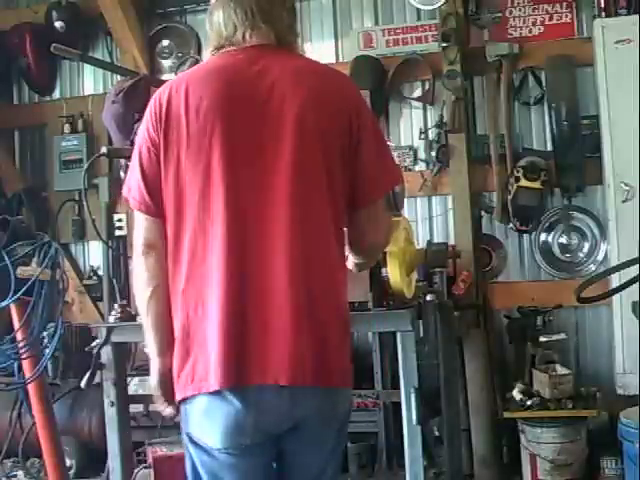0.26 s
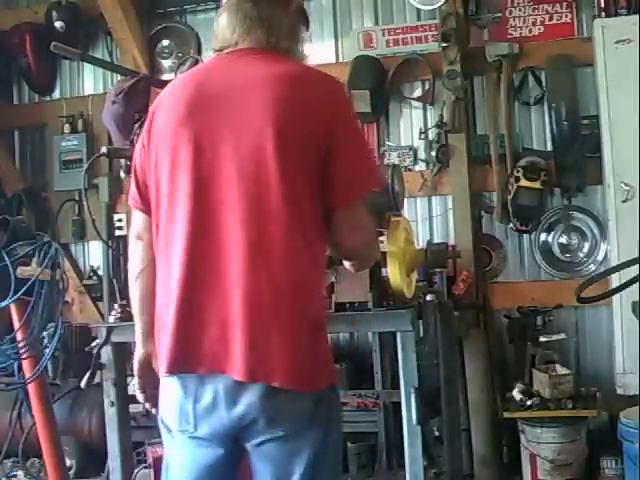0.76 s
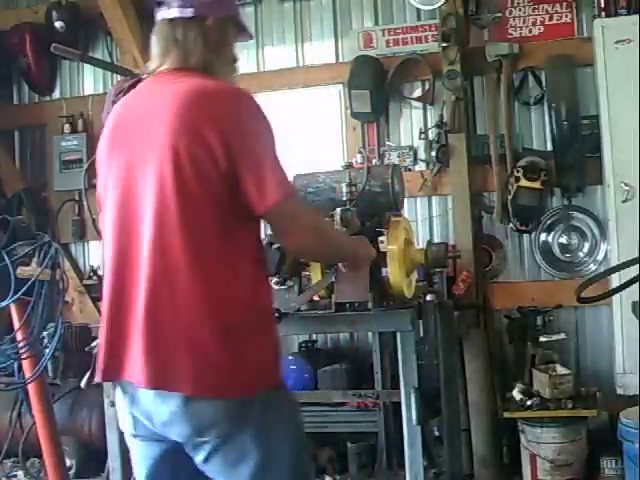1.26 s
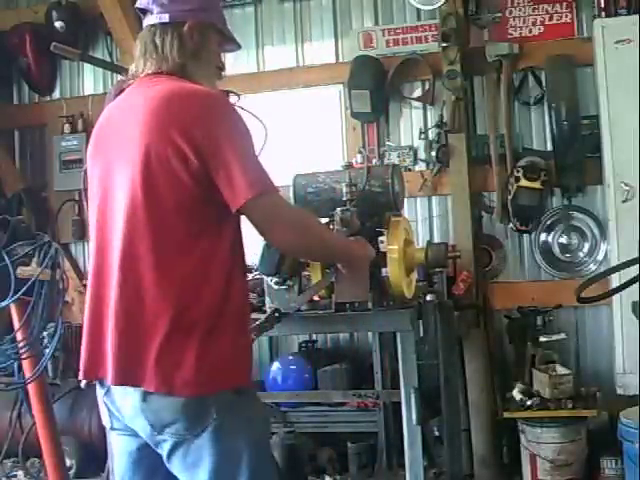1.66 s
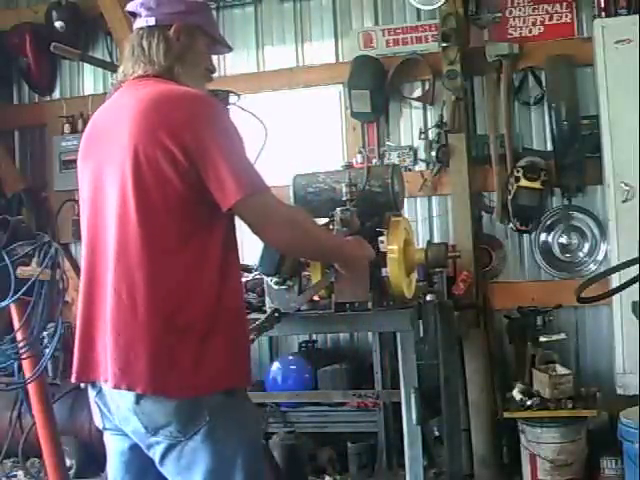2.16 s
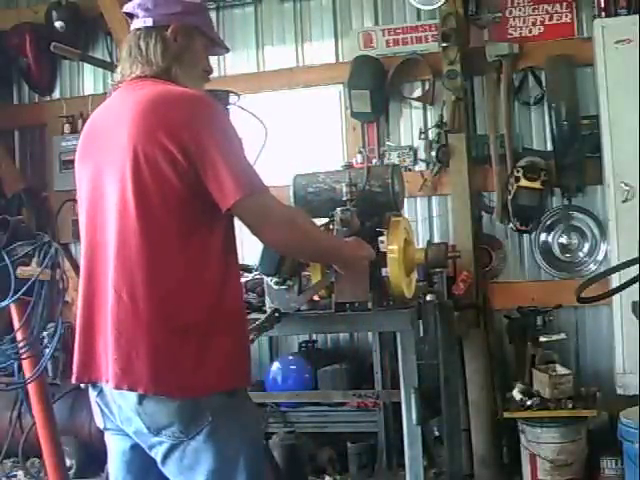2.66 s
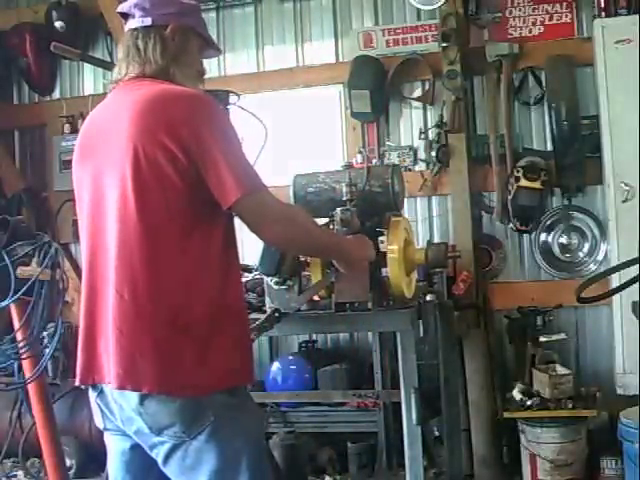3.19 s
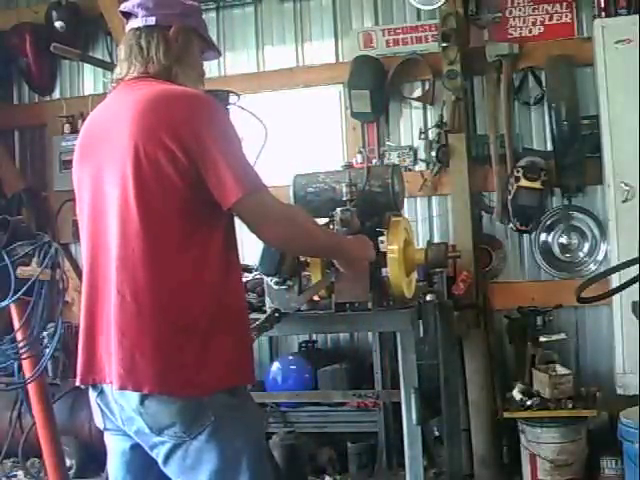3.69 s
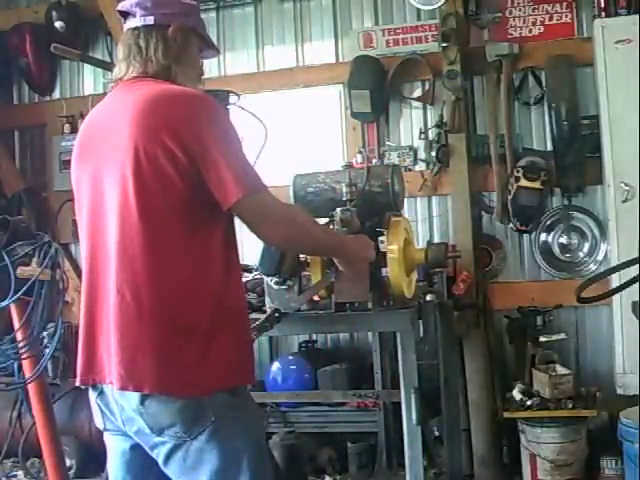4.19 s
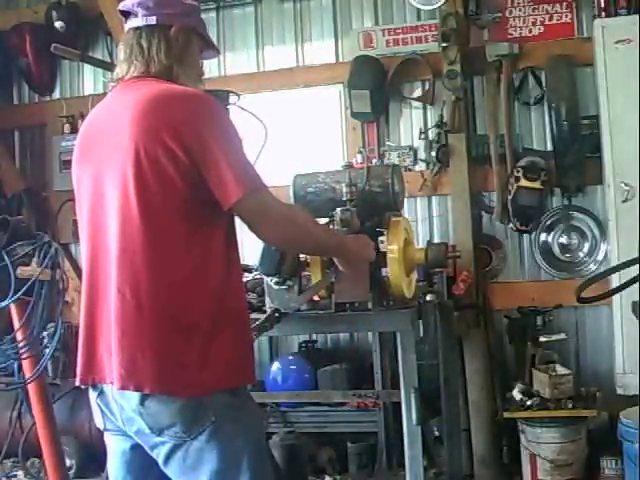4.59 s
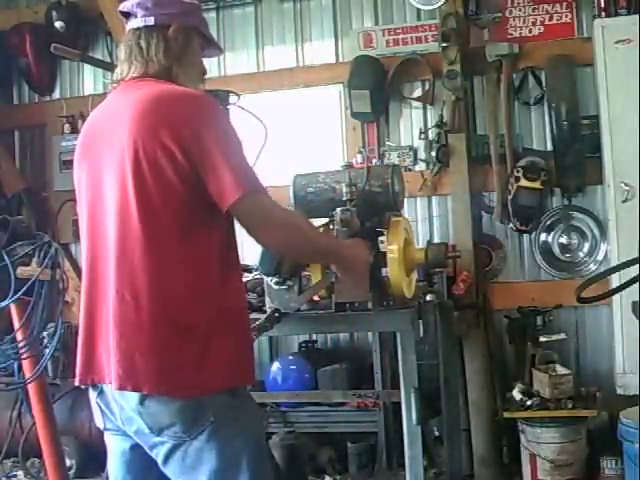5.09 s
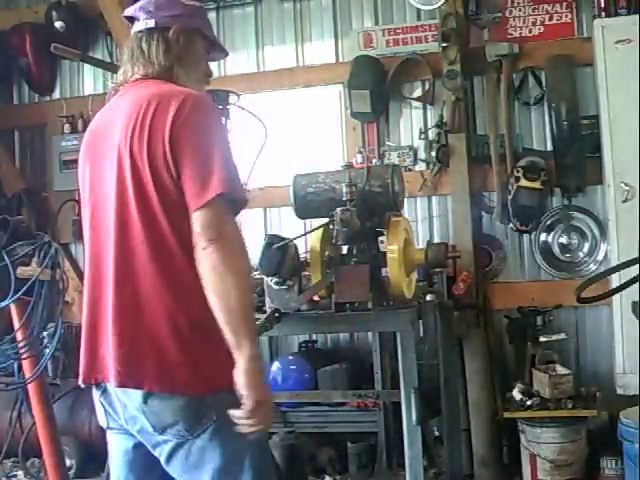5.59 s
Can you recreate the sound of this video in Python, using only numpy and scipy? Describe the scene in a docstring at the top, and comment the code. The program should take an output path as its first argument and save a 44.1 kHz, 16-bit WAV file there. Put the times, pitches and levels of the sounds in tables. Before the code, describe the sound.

An old single-cylinder engine chugs and rattles in a metal-walled shop, firing in loud, uneven, ringing bangs as it picks up speed.

```python
"""In a sheet-metal shop, an antique single-cylinder two-stroke runs on a bench.
It fires only now and then: each bang kicks the flywheel, which coasts against friction,
chugging, rasping and rattling once a turn. Each blast excites the resonances of pipe and bench
and reverberates between the metal walls. Once, burning charge spits back through the intake
in two quick bursts. The bangs overload a narrow-band microphone, which clips and crackles."""
import sys
import numpy as np
from scipy import signal
from scipy.fft import rfft, irfft, next_fast_len
from scipy.io import wavfile

SR = 44100
rng = np.random.default_rng(int(sys.argv[2]) if len(sys.argv) > 2 else 0)


def put_to_file(sound):
    """Save the sound as 16-bit audio at rate SR, in the file named by the first command-line argument."""
    columns = np.atleast_2d(sound).T  # one column per channel
    safe = np.clip(columns, -1, 1)
    whole_steps = np.round(safe * 32767)
    wavfile.write(sys.argv[1], SR, whole_steps.astype(np.int16))


N = 257984
TIME = np.arange(2 * SR // 3) / SR  # seconds within one event


def amp(db):
    """Amplitude ratio: a factor of ten per 20 dB."""
    return 10 ** (np.asarray(db) / 20)

def unit(x):
    """Normalisation to rms 1."""
    return x / np.sqrt(np.mean(x ** 2) + 1e-20)

def unit_onset(x):
    """Normalisation of a transient to rms 1 over its first 50 ms."""
    return x / np.sqrt(np.mean(x[:SR // 20] ** 2) + 1e-20)

def noise(size):
    """Gaussian white noise."""
    return rng.standard_normal(size)

def fade(t60):
    """Exponential decay by 60 dB in t60 seconds."""
    return amp(-60 * TIME / t60)

def swell(train, t60):
    """Convolution gives each impulse a quick rise and an exponential decay."""
    return signal.fftconvolve(train, fade(t60) * (1 - np.exp(-TIME / 0.014)))[:N]

def along(points, hz):
    """Interpolation of (Hz, value) points on a logarithmic frequency axis."""
    freqs, values = np.transpose(points)
    return np.interp(np.log(hz + 1), np.log(freqs), values)

def add(track, start_s, x):
    """Superposition of x on the track from start_s."""
    start = round(start_s * SR)
    x = x[max(-start, 0):max(len(track) - start, 0)]
    track[max(start, 0):][:len(x)] += x

def filtered(x, response):
    """Linear filtering: the spectrum is multiplied by a frequency response."""
    size = 2 * next_fast_len(len(x) // 2 + SR // 10)
    return irfft(rfft(x, size) * response(np.fft.rfftfreq(size, 1 / SR)), size)[:len(x)]

def coloured(x, spectrum):
    """Minimum-phase filtering: folding the cepstrum makes the response causal."""
    def response(hz):
        cepstrum = irfft(np.log(amp(along(spectrum, hz))))
        cepstrum[1:len(hz) - 1] *= 2
        cepstrum[len(hz):] = 0
        return np.exp(rfft(cepstrum))
    return filtered(x, response)

def rung(x, modes):
    """Modal superposition: x drives damped resonators in parallel."""
    return filtered(x, lambda f: sum(amp(db) * 1j * f * width / (hz * hz - f * f + 1j * f * width)
                                     for hz, width, db in modes))

def radiated(x, low_hz):
    """Radiation efficiency: a small source sends out little below low_hz."""
    return filtered(x, lambda hz: (1j * hz / low_hz) ** 4
                    / (1 + np.sqrt(2) * 1j * hz / low_hz - (hz / low_hz) ** 2) ** 2)

def turns(first_s=-.03, coast_s=3.7):
    """Times the exhaust port opens: between firings, friction slows the flywheel exponentially."""
    times = [first_s]
    for fire_s, *_, count in FIRINGS:
        share = np.linspace(0, 1, round(count) + 1)[1:]
        speed_lost = 1 - np.exp((times[-1] - fire_s) / coast_s)
        times.extend(times[-1] - coast_s * np.log(1 - share * speed_lost))
    return np.array(times)

def speed():
    """Rotation rate, the inverse of the period, in octaves above ten turns a second."""
    times = turns()
    midpoints = (times[1:] + times[:-1]) / 2
    return np.interp(np.arange(N) / SR, midpoints, -np.log2(10 * np.diff(times)))

def ticks(phase, scatter_db):
    """Cyclic excitation: one impulse a turn, at the fraction of the turn given by phase."""
    train, times = np.zeros(N), turns()
    for turn_s, period, deviation in zip(times, np.gradient(times), noise(len(times))):
        add(train, turn_s + phase * period, amp([scatter_db * deviation]))
    return train

# Decay of the shop. Each row: frequency in Hz, reverberation time in seconds.
SHOP_T60 = [(60, 0.62), (300, 0.67), (900, 0.67), (2000, 0.48), (4000, 0.27)]

def shop(x, wet_db):
    """Reverberation: reflections from the metal walls add a diffuse tail to the direct sound."""
    hz, t, spectra = signal.stft(noise(len(TIME)), SR, nperseg=256)
    decay = amp(-60 * t / along(SHOP_T60, hz)[:, None])
    tail = signal.istft(spectra * decay, SR, nperseg=256)[1]
    return x + amp(wet_db) * signal.fftconvolve(x, tail / np.linalg.norm(tail))[:len(x)]

# Modes of rubbing metal. Each row: frequency in Hz, nominal bandwidth in Hz, relative level in dB.
RUBBING_MODES = [(2952, 58, -2.5), (3177, 68, -3.5), (3700, 85, -1)]

def rasp():
    """Frictional excitation: dry metal rubs once a turn, and each mode varies on its own."""
    out = np.zeros(N)
    for hz, width, db in RUBBING_MODES:
        rub = unit(swell(ticks(.1, scatter_db=2), t60=.35))
        mode = [(hz, 2 * width, 0)]
        ring = rung(rung(noise(N), mode), mode)  # two passes steepen the skirts
        out += amp(db) * rub * unit(ring)
    return out * amp(-45.0 - 1.4 * speed())

# Boom of the exhaust port. Each row: frequency in Hz, bandwidth in Hz, relative gain in dB.
EXHAUST_MODES = [(56.3, 24, -1.5), (83, 42, 7.5), (109, 47, -3.5)]
# Rush of the gas. Each row: frequency in Hz, relative spectral density in dB.
PUFF_SPECTRUM = [(15, -31.5), (35, -15.5), (60, -5.5), (100, 1), (135, 0), (250, -4.5), (600, -41.5)]

def chug(gulp_phase=.29):
    """Pulsating flow: unfired charge puffs out of the port, and the piston gulps a new one."""
    puffs = ticks(0.062, scatter_db=1) + 1.2 * ticks(gulp_phase, scatter_db=1.5)
    boom = amp(-42.5) * unit(radiated(rung(puffs, EXHAUST_MODES), low_hz=40))
    flow = .06 + swell(puffs, t60=0.12)
    air = amp(-44) * unit(radiated(flow * coloured(noise(N), PUFF_SPECTRUM), low_hz=45))
    return (boom + air) * amp(9 * speed())

def shaking(steady_db=1.18, kick_db=3, delay_s=.09, width_s=0.048):
    """Amplitude modulation: the parts shake harder for a moment after each firing."""
    t = np.arange(N) / SR
    kicks = sum(np.exp(-((t - fire_s - delay_s) / width_s) ** 2) for fire_s, *_ in FIRINGS)
    return amp(steady_db + kick_db * kicks)

# Modes of the case and of loose iron. Each row: frequency in Hz, bandwidth in Hz, relative gain in dB.
CRANKCASE_MODES = [(182.4, 6.7, -12), (213.1, 6, -4), (263.5, 18, -6.5), (329.6, 20, 1), (368.5, 22, -9.5),
                   (408.2, 22, -9), (500, 15, -12.5)]
LOOSE_IRON_MODES = [(331.5, 9.8, 5), (778, 30, 3), (906, 80, -5.5), (1044, 34, -6), (1217, 61, -2.5),
                    (1292, 40, -5), (1405, 29, -7), (1650, 21, -9), (2286, 24, -15.5)]
# Rattle of loose parts. Each row: frequency in Hz, relative spectral density in dB.
RATTLE_SPECTRUM = [(90, -51.5), (130, -21.5), (200, -2), (400, 4.5), (600, -5), (1000, -0.5), (1400, -2.5),
                   (1900, -9), (2600, -14.5), (3300, -13.5), (3900, -15.5)]

def machinery():
    """Impact excitation: the rod knocks and rings the case; loose iron chatters, louder with speed."""
    octaves = speed()
    knocks = ticks(0, scatter_db=1) + ticks(.28, scatter_db=1) + .4 * ticks(.64, scatter_db=1)
    jolt = swell(knocks, t60=0.066)
    # Oil cushions the knocks; they stand out at low speed and merge into a hum at high speed.
    cushioned = filtered(knocks, lambda hz: 1 / (1 + 1j * hz / 330) ** 3)
    thuds = amp(-29.5) * unit(rung(cushioned, CRANKCASE_MODES))
    hum = amp(-27.5 + 5.6 * octaves) * unit((0.41 + jolt) * rung(noise(N), CRANKCASE_MODES))
    iron = amp(-26.5 + 10 * octaves) * unit((1 + 0.79 * jolt) * rung(noise(N), LOOSE_IRON_MODES))
    rattle = amp(-27.5 + 8 * octaves) * unit((1 + 1.2 * jolt) * coloured(noise(N), RATTLE_SPECTRUM))
    return radiated(shaking() * (thuds + hum + iron + rattle), low_hz=117)

# Spits from the intake. Each row: start in seconds, level in dB.
BLOWBACKS = [(2.278, -11.5), (2.321, -7.5)]
# Their timbre. Each row: frequency in Hz, relative spectral density in dB.
SPIT_SPECTRUM = [(150, -21.5), (380, -17), (520, 6), (750, -6), (1500, -1), (2600, -4), (3900, -15)]

def spits():
    """Flow reversal: burning charge blows back through the intake, sharp and without bass."""
    out = np.zeros(N)
    for start_s, db in BLOWBACKS:
        add(out, start_s, amp(db) * unit(coloured(noise(len(TIME)), SPIT_SPECTRUM)) * fade(0.54))
    return out

# The firings. Each row: start in seconds, blast level in dB, pipe frequency in Hz, relative pipe and
# thump levels in dB, 60 dB ringing time in seconds, flywheel turns leading up to this firing.
FIRINGS = [(.228, -1.8, 830, -8, -5, 0.54, 2), (1.491, -3, 788, 3.5, -1, 0.32, 10),
           (2.364, -1.5, 869.5, 0.5, -2.5, 0.44, 6), (2.838, -0.27, 835.3, 1.5, 4.5, .52, 4),
           (3.666, -1, 855.3, 2, 3.5, 0.53, 8), (4.446, -1, 864, -1, -0.5, .56, 8),
           (4.899, -0.67, 1001, -3, 2.5, 0.62, 5), (5.381, 1.5, 836, -2, 6.5, .72, 6),
           (5.828, 2, 857.4, 3.5, 7.5, 0.36, 6)]
# Modes of engine, pipe and bench. Each row: frequency in Hz, bandwidth in Hz, relative gain in dB.
BODY_MODES = [(212.1, 20, -4.5), (321.3, 23, -1), (384.2, 36, 0), (516, 40, -6), (770, 24, -2),
              (828, 14, 3), (887.5, 30, 0.5), (1045.5, 22, 0.5), (1147, 20, 0.5), (1212.5, 30, -3.5),
              (1657, 45, -6), (2098, 27, -10.5)]
# Roar and low push of a firing. Each row: frequency in Hz, relative spectral density in dB.
ROAR_SPECTRUM = [(20, -16.5), (60, -16), (150, -6), (300, 0), (450, -4), (620, -6.5), (850, 2), (1200, -3),
                 (1500, -9.5), (2200, -8.5), (3000, -14.5), (3900, -18)]
THUMP_SPECTRUM = [(12, -6), (30, 3), (60, 0), (100, -0.5), (150, -4), (300, -25), (600, -33)]

def bangs(hold_s=0.052, blast_delay_s=.003):
    """Transient excitation: the port pops, then the blast rings pipe and bench and fills the shop."""
    out, size = np.zeros(N), len(TIME)
    for start_s, blast_db, pipe_hz, pipe_db, thump_db, t60, _ in FIRINGS:
        pipe_phase = 2 * np.pi * pipe_hz * TIME
        pop = -.55 * np.sin(pipe_phase) * fade(0.081)
        burst = coloured(noise(size) * fade(t60 / 9), ROAR_SPECTRUM)
        roar = amp(-2.5) * unit_onset(shop(burst, wet_db=11))
        # Early reflections hold the level up before it falls.
        ringing = amp(-60 * (np.hypot(TIME, hold_s) - hold_s) / t60)
        body = amp(-3.5) * unit(rung(noise(size), BODY_MODES)) * ringing
        # Hot gas makes the pitch of the pipe wander.
        phase_drift = np.cumsum(noise(size)) * np.sqrt(40 / SR)
        pipe = amp(pipe_db - 5.5) * np.sin(pipe_phase + phase_drift) * ringing
        thump = amp(thump_db - 15) * unit(coloured(noise(size), THUMP_SPECTRUM)) * fade(.4)
        add(out, start_s, pop)
        add(out, start_s + blast_delay_s, amp(blast_db) * (roar + body + pipe + thump))
    return out

def scene():
    """Superposition: the engine's sounds add in one channel, a few steps away."""
    return (chug() + machinery() + rasp() + bangs() + spits())[None]

def clipped(x, top, hardness):
    """Saturation towards the amplitude top; greater hardness sharpens the knee."""
    return x / (1 + np.abs(x / top) ** hardness) ** (1 / hardness)

def lowpass(x, cutoff_hz, order):
    """Band limiting with a maximally flat, zero-phase response."""
    return filtered(x, lambda hz: 1 / np.sqrt(1 + (hz / cutoff_hz) ** (2 * order)))

def record(dry):
    """Overload distortion: a telephone-band converter saturates and overflows; its output clips again."""
    narrow = lowpass(dry[0], cutoff_hz=3850, order=25)
    samples = signal.resample_poly(narrow, 80, 441)  # down to 8 kHz
    overflow = np.abs(samples) > .8
    # The first sample of each overload jumps the wrong way, and the filter rings near its band edge.
    jumps = np.sign(samples) * (overflow & ~np.roll(overflow, 1))
    crackle = signal.lfilter([1], [1, .9, .4], jumps)
    saturated = clipped(samples, top=0.77, hardness=7.9)
    samples = clipped(saturated - 0.5 * crackle, top=0.71, hardness=37)
    wide = signal.resample_poly(samples, 441, 80, window=('kaiser', 7))[:N]
    smooth = lowpass(wide, cutoff_hz=4280, order=35)
    out = clipped(smooth, top=.73, hardness=40)
    return filtered(out, lambda hz: hz < 15900)[None]

dry = scene()
out = record(dry)
put_to_file(out)
```